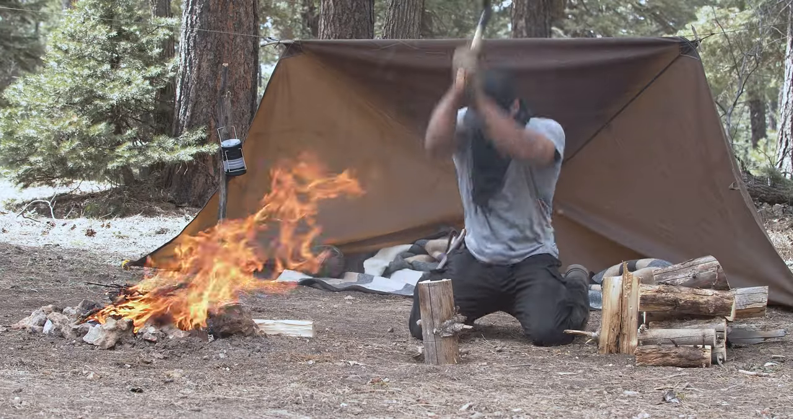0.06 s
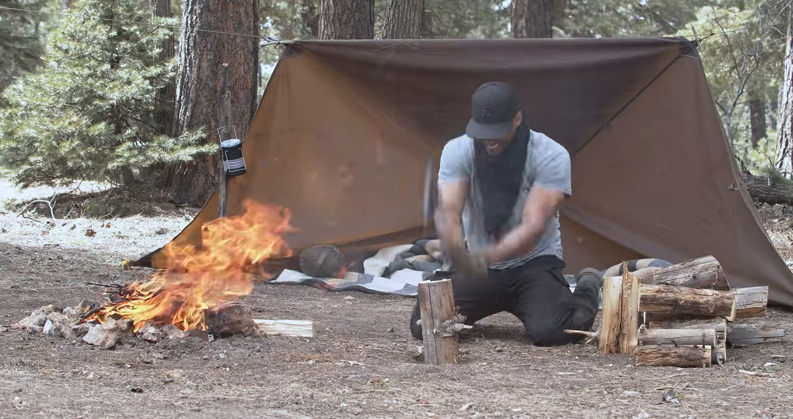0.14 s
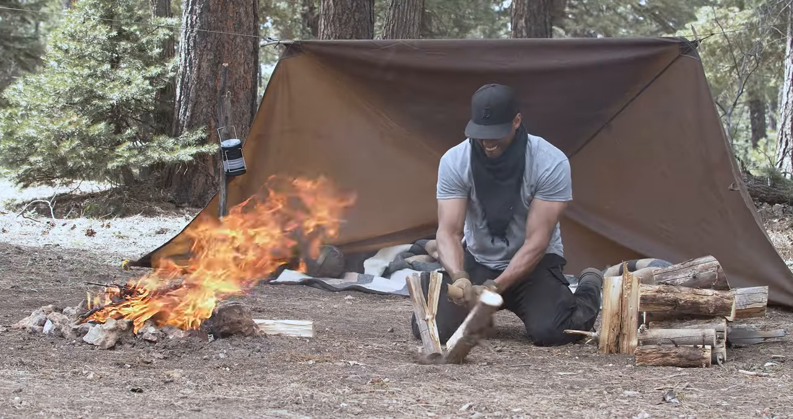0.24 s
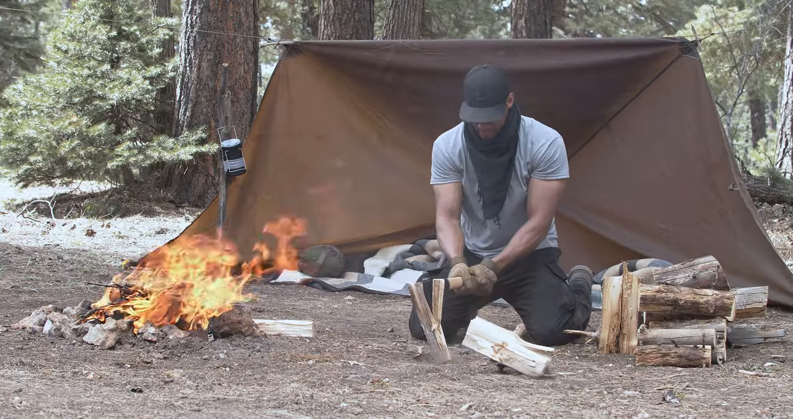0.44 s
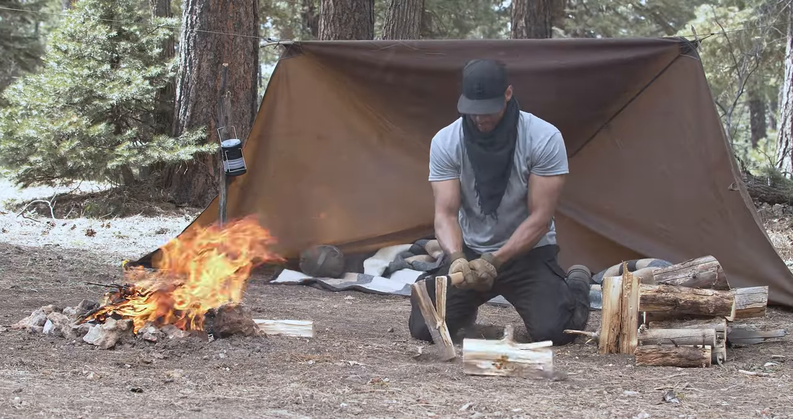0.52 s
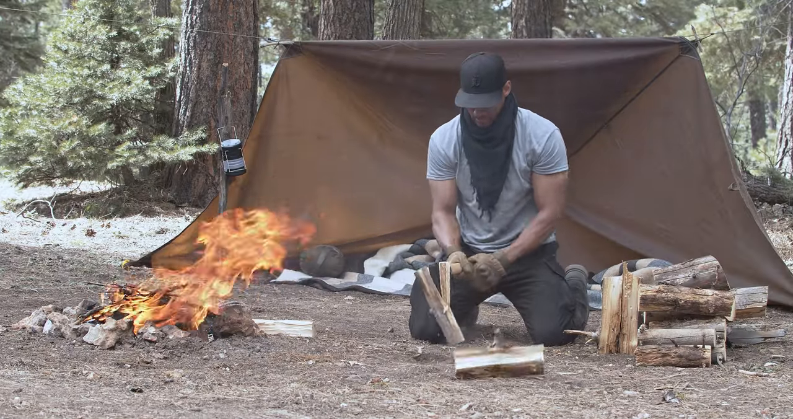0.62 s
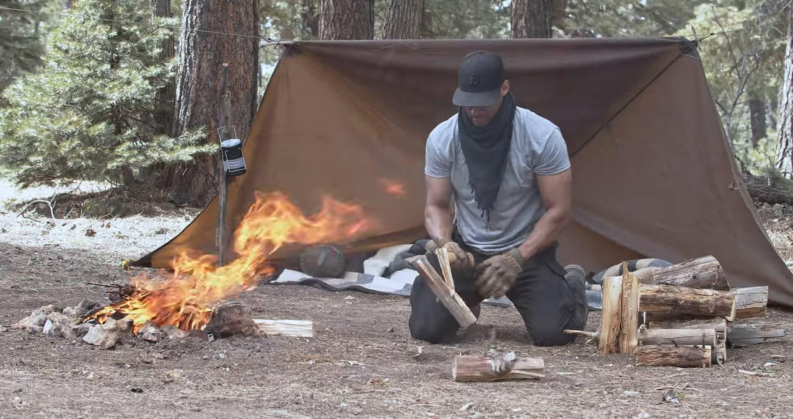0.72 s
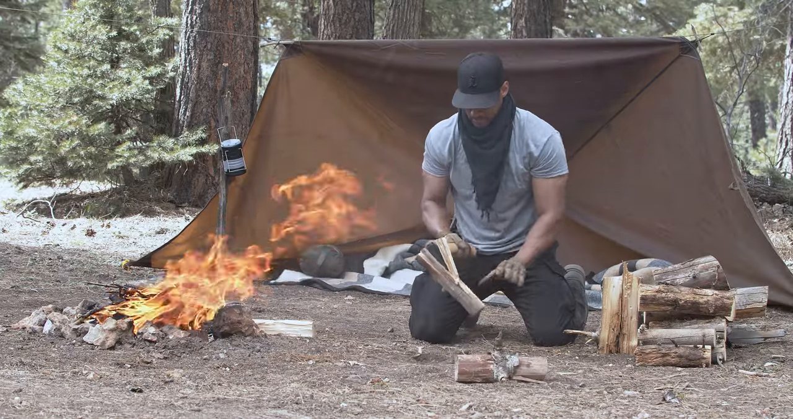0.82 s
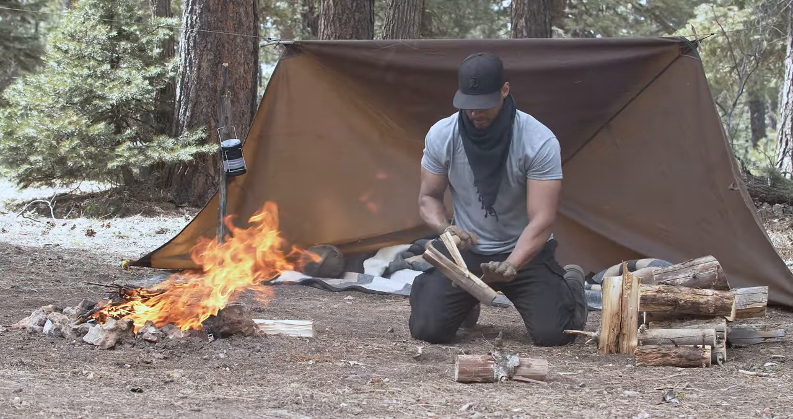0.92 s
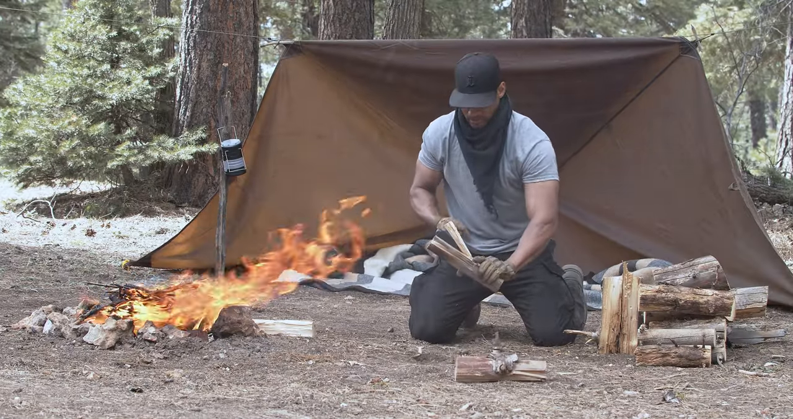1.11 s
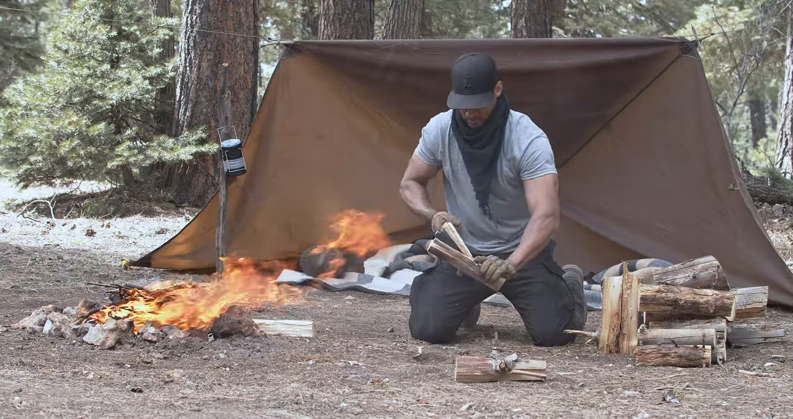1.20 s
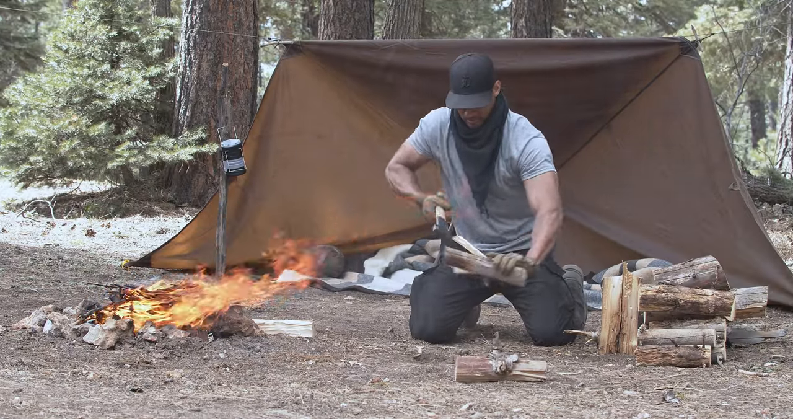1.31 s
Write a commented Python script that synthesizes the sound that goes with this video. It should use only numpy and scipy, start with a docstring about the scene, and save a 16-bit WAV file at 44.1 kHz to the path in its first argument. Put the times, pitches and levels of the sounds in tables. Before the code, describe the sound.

An axe splits a dry log with one loud, clipped crack beside a softly roaring campfire

```python
"""A forest camp: an axe splits a dry log on the ground and overloads the microphone input.
Fibres tear in a 15 ms crack built of dense random snaps that ring log and axe head; soil modes thump.
Fading noise bands are the crack scattered back by trunks; noise bursts are ember and splinter ticks.
At the end the split piece is pulled off the blade: two ringing knocks and a grainy scrape.
A camp fire roars softly in the forest air as fluttering noise, under a thin steady hiss near 15 kHz."""
import sys
import numpy as np
from scipy import signal
from scipy.fft import rfft, irfft
from scipy.io import wavfile
from scipy.ndimage import uniform_filter1d

SR = 44100
rng = np.random.default_rng(int(sys.argv[2]) if len(sys.argv) > 2 else 0)


def int16_out(signal):
    """Quantize to a 16-bit WAV file."""
    q = np.round(np.clip(np.atleast_2d(signal).T, -1, 1) * 32767)
    wavfile.write(sys.argv[1], SR, q.astype(np.int16))


def boost_factor(decibels):
    """Convert a level in decibels to a linear amplitude factor."""
    exponent = np.asarray(decibels, float) / 20
    return 10 ** exponent


N = 59535  # samples, 1.35 s
BLOW_S = .2299  # the crack starts, and its scatter with it


def curve(hz, table):
    """Level in dB at hz from a (Hz, dB) table, interpolated over log frequency."""
    table_hz, table_db = np.array(table, float).T
    return np.interp(np.log(np.maximum(hz, 1)), np.log(table_hz), table_db)


def colour(x, table):
    """Causal minimum-phase filter with the dB shape of a (Hz, dB) table."""
    log_gain = curve(np.fft.rfftfreq(2048, 1 / SR), table) * np.log(10) / 20
    cepstrum = irfft(log_gain)
    # fold the negative-time half forward, which makes the filter causal
    cepstrum[1:1024] *= 2
    cepstrum[1025:] = 0
    impulse = irfft(np.exp(rfft(cepstrum)))
    return signal.fftconvolve(x, impulse)[:len(x)]


def band(x, hz, width_hz):
    """Steep band-pass around hz."""
    low_hz = max(hz - width_hz / 2, hz / 4)
    high_hz = min(hz + width_hz / 2, SR * .45)
    sos = signal.butter(3, [low_hz, high_hz], "band", fs=SR, output="sos")
    return signal.sosfilt(sos, x)


def unit(x):
    """Scale to rms 1."""
    return x / np.sqrt(np.mean(x ** 2))


def ring(table):
    """Half a second of damped sine modes from a (Hz, dB, t60 s) table, as an impulse response."""
    t = np.arange(SR // 2) / SR
    return sum(boost_factor(db - 60 * t / t60) * np.sin(2 * np.pi * hz * t) for hz, db, t60 in table)


def after(start_s):
    """Seconds since start_s (0 before it), and a gate that opens there."""
    t = np.arange(N) / SR - start_s
    return np.maximum(t, 0), t >= 0


def walk(rate_hz):
    """Smooth random level with rms 1, from rate_hz random values a second."""
    hold = int(SR / rate_hz)
    stairs = np.repeat(rng.standard_normal(N // hold + 1), hold)
    smooth = uniform_filter1d(uniform_filter1d(stairs, hold), hold)
    return unit(smooth[:N])


def air():
    """Fire roar and forest air: half-octave noise bands; the flames make the bass flutter most."""
    # spectrum of roar and air: pitch_hz [Hz], density_db [relative dB per Hz]
    air_spectrum = [(15, -3.5), (45, -1.5), (100, -5), (200, -13.5), (370, -15.5), (800, -13.5),
                    (1300, -15.5), (1940, -21.5), (3200, -30.5), (5160, -39.5), (8000, -45), (16000, -48)]
    air_db, bass_flutter_db = -43, 2
    bed, swell = 0, walk(2)
    for hz in 16 * 2 ** np.arange(0, 10.3, .5):
        depth_db = bass_flutter_db / (1 + hz / 300) + 0.67
        # one second of run-in lets the filter settle
        noise = unit(band(rng.standard_normal(N + SR), hz, hz * .36)[SR:])
        band_db = curve(hz, air_spectrum) + depth_db * walk(14) + .5 * swell
        bed = bed + noise * np.sqrt(hz) * boost_factor(band_db)  # sqrt(hz): a wider band holds more power
    return boost_factor(air_db) * unit(bed)


def whine():
    """A thin steady hiss near the top: one narrow band of noise."""
    whine_hz, width_hz, whine_db = 15000, 275, -79
    return boost_factor(whine_db) * unit(band(rng.standard_normal(N), whine_hz, width_hz))


def ticks():
    """Embers and splinters: short decaying noise bursts, each with its own pitch region."""
    # ticks: start_s [s], level_db [relative dB], centre_hz [Hz], width_hz [Hz], t60_s [s]
    tick_list = [(0.0458, -21.5, 6500, 5000, 0.0072), (0.1192, -43.5, 4500, 5000, .02),
                 (.363, -42, 14130, 5000, .03), (.396, -38, 6500, 4000, 0.029),
                 (.442, -45.5, 8900, 5000, 0.026), (.465, -40.5, 14500, 4000, .01),
                 (.514, -48.5, 9000, 8000, 0.016), (.541, -45, 7000, 3000, 0.019),
                 (0.6336, -48, 7000, 6030, .05), (.696, -48.5, 7000, 6000, 0.052),
                 (0.7588, -42.5, 6500, 3000, 0.066), (0.8534, -45.5, 6500, 4000, .04),
                 (.8859, -44.5, 5000, 5000, 0.065), (1.056, -51, 6000, 4000, 0.035),
                 (1.1354, -48, 5000, 5000, .02)]
    broad_db = -11.5  # broad part of each tick, against its pitched band
    out = 0
    for start_s, tick_db, hz, width_hz, t60 in tick_list:
        t, on = after(start_s)
        noise = rng.standard_normal(N)
        grain = unit(band(noise, hz, width_hz)) + boost_factor(broad_db) * unit(band(noise, 10000, 12000))
        attack = np.minimum(t / .0004, 1)
        out = out + on * boost_factor(tick_db - 60 * t / t60) * attack * grain / 2
    return out


def crack():
    """Fibres snap densely until the log parts; the snaps ring the modes of log and axe head."""
    # colour of the crack: pitch_hz [Hz], level_db [dB]
    crack_colour = [(60, -20), (340, -12.5), (1300, -17), (2300, -7), (3100, -6), (4500, -1.5), (5600, 1),
                    (7500, -3), (9000, -12.5), (16000, -14.5)]
    # modes of log and axe head: pitch_hz [Hz], level_db [relative dB], t60_s [s]
    log_modes = [(1100, -15.5, 0.01956), (1936, -4.5, 0.037), (2357, -8, 0.048), (2730, -11.5, 0.024),
                 (3660, -6.5, 0.026), (3886, -6, 0.035), (4447, -7.5, .035), (4570, -8, .035),
                 (5526, -10, 0.03), (5800, -9, .025), (6169, -6, .025), (7590, -12, .02)]
    blow_db, ring_db = 4.5, -10.5  # ring against the coloured snaps
    tear_s, fade_s, end_fade_s = 0.015, 0.0073, 0.0011  # fades are time constants
    fibres_per_s, fibre_spread_db = 8300, 5

    t, on = after(BLOW_S)
    tear = on * np.exp(-t / fade_s) * np.exp(-np.maximum(t - tear_s, 0) / end_fade_s)
    chance = rng.random(N)
    strength = rng.standard_normal(N) * boost_factor(fibre_spread_db * rng.exponential(size=N))
    # a sample holds a snap when its draw falls below the fibre rate, with a soft edge
    snapping = np.clip((fibres_per_s / SR - chance) * 20, 0, 1)
    snaps = tear * strength * snapping
    body = colour(snaps, crack_colour)
    modes = signal.fftconvolve(snaps, ring(log_modes))[:N]

    def even(x):
        """Scale the energy to that of rms 1 over the tear."""
        return x / np.sqrt(np.sum(x ** 2) / (tear_s * SR))

    return boost_factor(blow_db) * (even(body) + boost_factor(ring_db) * even(modes))


def forest():
    """The crack scattered back: noise bands with a fast and a slow fade, plus near-trunk echoes."""
    # scatter by band: centre_hz [Hz], early_db [dB], early_t60_s [s], late_db [dB], late_t60_s [s]
    scatter = [(293, -28.5, .1, -48, .6), (600, -26, 0.092, -52, 0.5), (1092, -24.5, 0.068, -46, 1),
               (1698, -29, .12, -40, 0.99), (2407, -19.5, 0.13, -37.5, 1.18), (3570, -19, .15, -36.5, 1.06),
               (5000, -20, 0.15, -39, .9), (7000, -22, 0.098, -51, 0.96), (10100, -29.5, .11, -61, .6),
               (14500, -27.5, 0.079, -57.5, .6)]
    # echoes off near trunks: delay_s [s], level_db [dB], smear_s [s]
    trunk_echoes = [(.031, -21, 0.0023), (.05, -24, 0.004), (.08, -35, .005), (.097, -33.5, 0.0039)]
    trunk_hz, trunk_width_hz = 3810, 4000

    t, on = after(BLOW_S)
    tail = 0
    for hz, early_db, early_t60, late_db, late_t60 in scatter:
        noise = unit(band(rng.standard_normal(N), hz, hz * 0.39))
        fade = boost_factor(early_db - 60 * t / early_t60) + boost_factor(late_db - 60 * t / late_t60)
        tail = tail + noise * boost_factor(1.5 * walk(90)) * fade
    for delay_s, echo_db, smear_s in trunk_echoes:
        noise = unit(band(rng.standard_normal(N), trunk_hz, trunk_width_hz))
        tail = tail + boost_factor(echo_db) * np.exp(-((t - delay_s) / smear_s) ** 2) * noise
    return on * tail


def thump():
    """A soft half-sine push into the low modes of the soil, late against the crack."""
    # modes of the ground: pitch_hz [Hz], level_db [dB], t60_s [s]
    ground_modes = [(78, -12, .11), (136, -31.5, 0.44)]
    thump_s, push_s = .2435, 0.0023  # start, push length
    t, on = after(thump_s)
    push = on * np.sin(np.pi * np.minimum(t / push_s, 1))
    return signal.fftconvolve(push / push.sum(), ring(ground_modes))[:N]


def piece():
    """Split piece off the blade: slip noise rings its modes in two knocks, with a grainy scrape."""
    # knocks of the split piece: start_s [s], peak_db [dB], tilt_db [dB per octave], slip_s [s]
    knocks = [(1.2825, -27.5, -2, 0.0021), (1.3347, -23.5, 2, 0.00069)]
    # modes of the split piece: pitch_hz [Hz], level_db [relative dB], t60_s [s]
    piece_modes = [(1890, -18, 0.022), (2726, 0, 0.017), (3000, 0.5, 0.023), (3810, -2.5, 0.016),
                   (4310, -2.5, 0.012), (4730, -3.5, 0.021), (6500, -18.5, 0.009), (9400, -26.5, 0.0066)]
    # scrape of wood on steel, before its flicker: time_s [s], level_db [dB]
    scrape = [(1.285, -67), (1.301, -60), (1.315, -50), (1.33, -59), (1.349, -52)]
    scrape_hz, scrape_width_hz, flicker_db = 4500, 3800, 2.52

    out = np.zeros(N)
    for start_s, peak_db, tilt_db, slip_s in knocks:
        t, on = after(start_s)
        slip = on * t * np.exp(-t / slip_s * 2) * rng.standard_normal(N)
        # brightness tilts the modes about 3 kHz
        tilted = [(hz, db + tilt_db * np.log2(hz / 3000), t60) for hz, db, t60 in piece_modes]
        knock = signal.fftconvolve(slip, ring(tilted))[:N]
        out = out + boost_factor(peak_db) * knock / np.abs(knock).max()

    time_s, scrape_db = np.array(scrape).T
    grains = rng.standard_normal(N) * boost_factor(3 * rng.exponential(size=N))
    grit = unit(band(grains, scrape_hz, scrape_width_hz))
    path_db = np.interp(np.arange(N) / SR, time_s, scrape_db, left=-120)
    return out + grit * boost_factor(path_db + flicker_db * walk(150))


def scene():
    """All sources summed at the microphone, one channel."""
    return (air() + whine() + ticks() + crack() + forest() + thump() + piece())[None]


def low_pass(x):
    """Removes everything above the highest recorded frequency."""
    return signal.sosfilt(signal.butter(12, 15910, fs=SR, output="sos"), x)


def record(dry):
    """Microphone colour, then an input that clips hard at full scale."""
    # microphone colour: pitch_hz [Hz], level_db [dB]
    mic_colour = [(20, 1), (8000, 0), (11000, -1), (13000, -1.5), (15000, 6.5), (16500, 0), (22000, -2.5)]
    heard = colour(dry[0], mic_colour)
    clipped = np.clip(heard, -1, 1)
    return low_pass(clipped[None])


dry = scene()
out = record(dry)
int16_out(out)
```